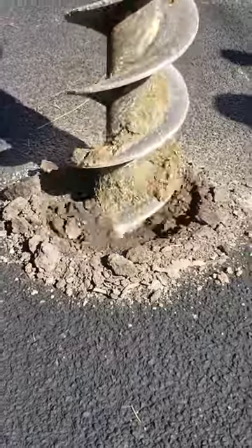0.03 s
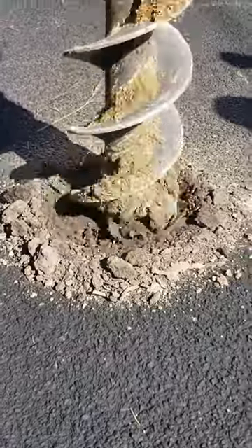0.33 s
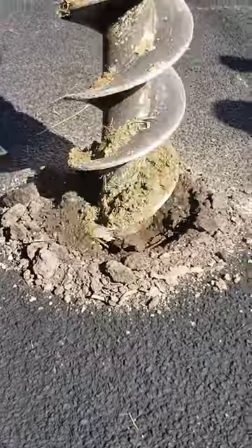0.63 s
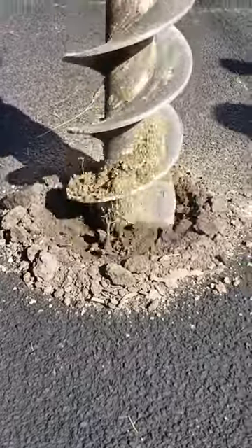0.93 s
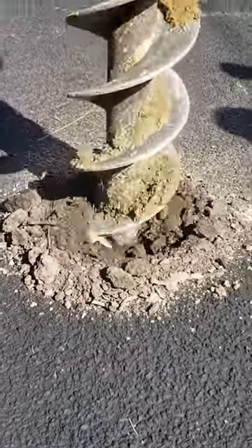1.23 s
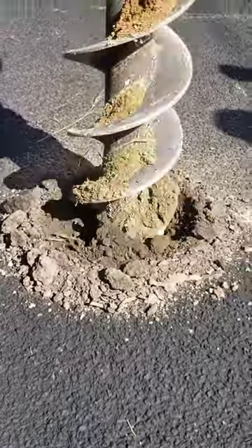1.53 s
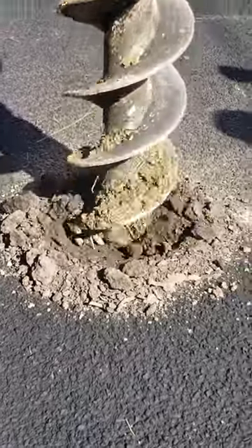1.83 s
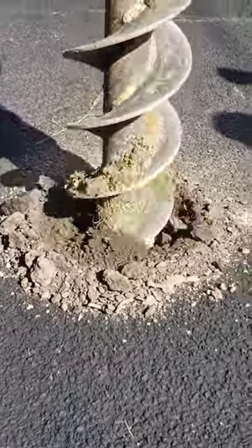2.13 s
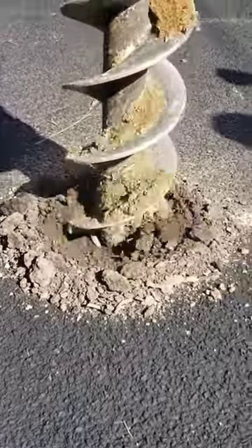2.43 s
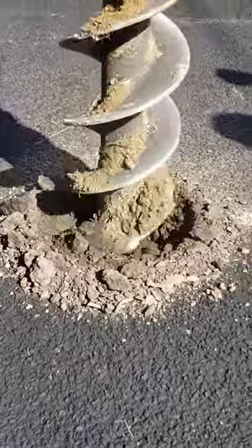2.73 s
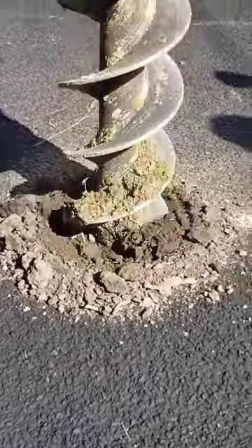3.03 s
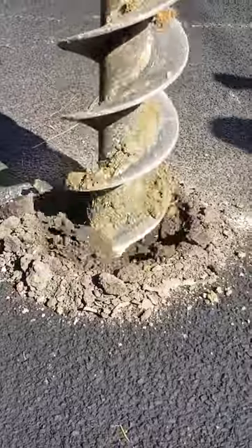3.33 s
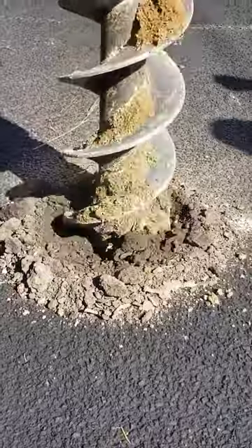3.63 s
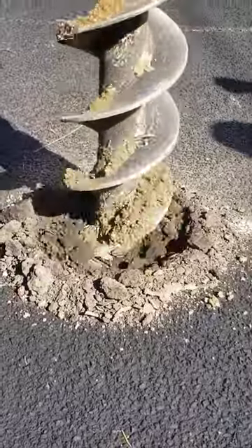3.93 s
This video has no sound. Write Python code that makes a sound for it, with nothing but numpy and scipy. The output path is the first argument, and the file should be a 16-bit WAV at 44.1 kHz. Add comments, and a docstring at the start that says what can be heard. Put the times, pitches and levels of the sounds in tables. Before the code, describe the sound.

A diesel engine drones and clatters at steady speed, with a strong fan hum and a hydraulic whine. The auger it drives scrapes through soil and grit, squeaking briefly against a hole in asphalt about once a second.

```python
"""A three-cylinder diesel drones and clatters at steady speed from the outset, while its cooling fan sings
one strong note and its hydraulic pump whines. It drives an earth auger slowly round in a hole in asphalt.
Soon the steel flight squeals thinly in the soil, grit ticks against it and the loaded auger groans.
At about 0.65 s, and then once a turn (1.1 s), the flight scrapes harder and squeaks on the rim."""
import sys
import numpy as np
from scipy import signal
from scipy.fft import rfft, irfft, next_fast_len
from scipy.io import wavfile
from scipy.ndimage import map_coordinates

SR = 44100
rng = np.random.default_rng(int(sys.argv[2]) if len(sys.argv) > 2 else 0)


def persist_wave(psi):
    """Save psi, clipped to +-1, as 16-bit WAV."""
    counts = np.round(np.clip(psi, -1, 1) * 32767).astype(np.int16)
    wavfile.write(sys.argv[1], SR, np.atleast_2d(counts).T)


N = 176400

# Spectra of bright hiss and of rubbed soil. Each row: frequency in Hz, relative density in dB.
HISS_SPECTRUM = [(1500, -100), (3500, -84.5), (5000, -93), (6300, -123), (7900, -112), (10000, -96.5),
                 (12500, -88.5), (15500, -90)]
SOIL_SPECTRUM = [(250, -65), (900, -64), (1600, -61), (2200, -66), (3000, -70), (4200, -83), (6000, -90.5),
                 (7900, -104), (13000, -91.5)]
# Ringing tones of the steel flight, plus one narrow treble resonance near 5.4 kHz that colours the
# scrape. Each row: frequency in Hz, relative gain in dB, 60 dB decay time in seconds.
RESONANCES = [(2053, 0, .12), (2266, 3, .13), (2985, 0, .13), (3790, -1, .08), (4270, -2, .08),
              (5420, 4, .08)]


def amp(db):
    """Decibels as an amplitude ratio."""
    return 10 ** (np.asarray(db) / 20)


def along(points, hz):
    """Interpolation of (Hz, value) points on a logarithmic frequency axis."""
    frequencies, values = np.transpose(points)
    return np.interp(np.log(hz + 1), np.log(frequencies + 1), values)


def clock():
    """Sample times in seconds."""
    return np.arange(N) / SR


def curve(rows):
    """Linear interpolation of (seconds, value) rows at every sample."""
    return np.interp(clock(), *np.transpose(rows))


def wobble(rate):
    """Slow noise: a spline through rate random knots a second."""
    return map_coordinates(rng.standard_normal(int(N * rate / SR) + 4), [clock() * rate])


def filtered(x, response):
    """Linear filtering: the spectrum of x times a frequency response."""
    size = next_fast_len(N + SR // 2)
    return irfft(rfft(x, size) * response(np.fft.rfftfreq(size, 1 / SR)), size)[..., :N]


def noise(spectrum, gain=1):
    """Partially coherent noise at two microphone ports, shaped in time by gain, then coloured."""
    # Each row: frequency in Hz, correlation between the ports.
    coherence = [(100, 0.68), (450, 0.74), (700, 0.44), (1100, 0.25), (5000, 0.1)]

    def colour(hz):
        spread = np.arccos(np.clip(along(coherence, hz), -1, 1)) / 2
        return amp(along(spectrum, hz)) * [np.cos(spread), np.sin(spread)]
    white = rng.standard_normal((2, N)) * np.sqrt(SR / 2)
    mid, side = filtered(gain * white, colour)
    return np.array([mid + side, mid - side])


def tones(angle, harmonics, flutter, rate, smear_rad=3):
    """Fourier synthesis: fluttering harmonics of an angle, which join into pulses if nearly in phase."""
    out = np.zeros(N)
    for order, db in harmonics:
        waver = 1 + flutter * (wobble(rate) + 1j * wobble(rate))
        phase = round(order) * angle + smear_rad * rng.standard_normal()
        out += np.sqrt(2) * amp(db) * np.imag(waver * np.exp(1j * phase))
    return out


def throb(angle, order, depth_db):
    """Amplitude modulation: a gain of rms 1 that peaks order times a cycle."""
    gain = amp(depth_db * np.cos(order * angle + rng.uniform(0, 2 * np.pi)))
    return gain / np.sqrt(np.mean(gain ** 2))


def arch(start, length):
    """A rounded envelope: the square root of a half sine."""
    return np.abs(np.sin(np.pi * np.clip((clock() - start) / length, 0, 1))) ** .5


def engine(angle):
    """Periodic forcing: exhaust, block and gears sound harmonics of the cycle over pulsing noise."""
    # Each row: multiple of the cycle rate, level in dB.
    exhaust_orders = [(3, -31.5), (6, -24.5), (9, -37)]
    block_orders = [(5, -47.5), (10, -44), (11, -43), (12, -55), (14, -50.5), (17, -47.5), (18, -56.5),
                    (24, -50.5), (27, -44.5), (33, -43.5), (34, -45), (36, -47)]
    timing_gear_orders = [(55, -45.5), (70, -52.5), (72, -46.5), (82, -44.5), (86, -51), (92, -49.5),
                          (94, -55.5), (98, -54), (167, -55)]
    whine_orders = [(164, -43)]
    # Each row: frequency in Hz, spectral density in dB.
    rumble_spectrum = [(12, -88.5), (25, -77), (40, -54.5), (85, -53.5), (130, -54.5), (200, -64.5),
                       (300, -71), (700, -100)]
    clatter_spectrum = [(400, -88), (850, -69.5), (1300, -64), (1750, -82), (2400, -76.5), (2800, -71.5),
                        (3300, -86), (5000, -100), (8000, -112)]
    surge_rad = .04  # the crank surges once a cycle
    firing = tones(angle + surge_rad * np.sin(angle), exhaust_orders, flutter=.04, rate=14, smear_rad=.45)
    drone = tones(angle, block_orders, flutter=.08, rate=13)
    rumble = noise(rumble_spectrum, throb(angle, order=3, depth_db=2.5))
    gears = tones(angle, timing_gear_orders, flutter=.28, rate=30)
    whine = tones(angle, whine_orders, flutter=.18, rate=79)
    knocks = throb(angle, order=4, depth_db=2.6) * throb(angle, order=9, depth_db=1.7)
    clatter = noise(clatter_spectrum, knocks * amp(.5 * wobble(8.3)))
    return firing + drone + rumble + gears + whine + clatter


def fan(angle):
    """A tone at the blade-passing frequency stands above the broadband noise of rushing air."""
    # Each row: harmonic number, level in dB.
    blade_harmonics = [(1, -19.5), (3, -46)]
    # Each row: frequency in Hz, spectral density in dB.
    air_spectrum = [(120, -84.5), (260, -66.5), (350, -64), (500, -60.5), (660, -53.5), (770, -63.5),
                    (1300, -69), (2600, -73.5), (4000, -79.5), (8000, -110)]
    passes_per_cycle = 36.76
    return tones(passes_per_cycle * angle, blade_harmonics, flutter=.018, rate=42) + noise(air_spectrum)


def pump(angle):
    """Oil pressure modulates the amplitude of whine and hiss; the hiss also pulses at the firing rate."""
    # Each row: harmonic number, level in dB at peak pressure.
    pump_harmonics = [(1, -35), (2, -37), (3, -47.5), (6, -53.5), (7, -61.5)]
    # The auger takes up its load. Each row: time in seconds, pressure in dB relative to its peak.
    pressure_db = [(0, -7), (.3, -5.5), (.6, 0), (1.1, -1.5), (2.5, -1.5), (4, -1)]
    periods_per_cycle = 25.45
    pressure = amp(curve(pressure_db))
    pulse = throb(angle, order=3, depth_db=2.5) * throb(angle, order=1, depth_db=2.5)
    pulse *= amp(.7 * wobble(28))
    whine = pressure * tones(periods_per_cycle * angle, pump_harmonics, flutter=.24, rate=34)
    return whine + noise(HISS_SPECTRUM, pressure * pulse)


def scrape():
    """Friction noise: a continuous rub, broken by clods that crumble as a Poisson process."""
    # How hard the flight scrapes. Each row: time in seconds, gain in dB.
    effort_db = [(0, -30), (.25, -10.5), (.5, -4.5), (.63, 3.5), (.8, -6), (1.05, -9.5), (1.4, -6),
                 (1.62, -.5), (1.82, 2), (1.95, -13), (2.4, -4.5), (2.6, -9), (2.9, 0), (3.05, -8.5),
                 (3.35, -13), (3.72, -3), (3.88, -6), (4, 2.5)]
    crumbs_per_s, crumb_db, spread_db, decay_s = 130, -3, 2, .0028
    breaks = rng.random(N) < crumbs_per_s / SR
    strength = amp(crumb_db + spread_db * np.clip(rng.standard_normal(N), -2, 2))
    crumbs = signal.lfilter([1], [1, -np.exp(-1 / (decay_s * SR))], breaks * strength)
    rub = amp(-3 + 1.6 * wobble(350) + 1.5 * wobble(30))
    return noise(SOIL_SPECTRUM, amp(curve(effort_db)) * np.hypot(crumbs, rub))


def ring(drive):
    """Resonance: damped resonators give the flight's ringing tones and one narrow treble peak."""
    def resonator(f, hz, db, t60):
        bandwidth_hz = np.log(1000) / np.pi / t60
        damping = 1j * f * bandwidth_hz
        return amp(db) * damping / (hz * hz - f * f + damping)
    return filtered(drive, lambda f: sum(resonator(f, *row) for row in RESONANCES))


def squeals():
    """Friction-excited vibration: steel sliding in soil gives a thin, unsteady tone."""
    # Each row: start in seconds, length in seconds, level in dB.
    slips = [(0.088, 0.12, -35), (0.569, 0.03, -26), (1.198, 0.068, -32), (3.43, .1, -35)]
    centre_hz = 1730
    pitch = centre_hz * (1 + .04 * wobble(400))
    envelope = sum(amp(db) * arch(start, length) for start, length, db in slips)
    return envelope * np.sin(2 * np.pi * np.cumsum(pitch) / SR)


def grit():
    """Impact transients: each stone on the flight gives a dull knock, a hard click and a bright edge."""
    # Each row: start in seconds, then gains of knock, click and edge in dB.
    strikes = [(.353, -4, -5, -8), (.507, 3, 2.5, 3), (.578, 1, -7, 14), (.608, -1, -5, 0),
               (.732, 0, -5, 3), (1.592, -2, -7, -3), (1.685, 0, -5, 5), (1.777, 2, 2.5, 6),
               (1.824, 0, -5, 2), (2.725, 2, -1.5, -4), (2.792, -7, -8, 9), (3.487, 3.5, -12, -6)]
    # Each row: frequency in Hz, relative density in dB.
    click_spectrum = [(2000, -86), (3700, -65), (5300, -74), (6400, -91), (8000, -108)]
    t60_s = .039
    starts, knock_db, click_db, edge_db = np.transpose(strikes)
    age = clock() - starts[:, None]
    decay = (age >= 0) * amp(-60 * np.abs(age) / t60_s)
    knock = noise(SOIL_SPECTRUM, amp(knock_db) @ decay)
    click = noise(click_spectrum, amp(click_db) @ decay)
    edge = noise(HISS_SPECTRUM, amp(edge_db) @ decay)
    return knock + click + edge


def groans():
    """Low-frequency vibration: the loaded auger judders in the hole in short glides."""
    # Each row: start and length in seconds, first and last pitch in Hz, level in dB.
    judders = [(0.559, .12, 110, 65, -30.5), (1.667, .12, 93.5, 68.6, -27.5),
               (2.41, .1, 103.4, 55.3, -24.5), (2.72, .08, 100, 60.3, -31), (2.94, .09, 54.9, 95, -25)]
    out = np.zeros(N)
    for start, length, from_hz, to_hz, db in judders:
        pitch = curve([(start, from_hz), (start + length, to_hz)])
        phase = 2 * np.pi * np.cumsum(pitch) / SR + rng.uniform(0, 2 * np.pi)
        out += amp(db) * arch(start, length) ** 2 * np.sin(phase)
    return out


def squeaks():
    """Friction on the rim excites the flight's two lowest modes, which beat under a rasp and ring on."""
    # Each row: start and hold in seconds, gain in dB, second mode relative to the first in dB.
    rim_slips = [(.647, .012, -15, -7), (1.757, .011, -17.3, -2), (2.867, .012, -20.5, -9),
                 (3.967, .008, -27, -3), (3.985, .012, -22.5, -2)]
    # Each row: frequency in Hz, relative density in dB.
    rasp_spectrum = [(500, -87), (1300, -60), (2100, -54), (3000, -56), (4000, -62), (5800, -75),
                     (7200, -95), (8500, -93), (13000, -78.5)]
    attack_s, release_t60_s = .005, .055
    pitch_jitter, flutter_db, rasp_db, ring_db = .03, 1.5, 8, -6
    t, out, pressing = clock(), np.zeros((2, N)), np.zeros(N)
    for start, hold, db, upper_db in rim_slips:
        attack = np.clip((t - start) / attack_s, 0, 1)
        release = amp(-60 * np.maximum(t - start - hold, 0) / release_t60_s)
        bite = amp(db) * attack * release
        for (hz, _, _), share in zip(RESONANCES, [1, amp(upper_db)]):
            pitch = hz * (1 + pitch_jitter * wobble(700))
            flutter = amp(flutter_db * wobble(400))
            out += share * bite * flutter * np.sin(2 * np.pi * np.cumsum(pitch) / SR)
        pressing += bite
    out += noise(rasp_spectrum, amp(rasp_db) * pressing)
    return out + amp(ring_db) * ring(out)


def scene():
    """Superposition: one crankshaft drives engine, fan and pump, while soil and grit ring the flight."""
    # Each row: time in seconds, engine speed in four-stroke cycles per second.
    cycle_rate = [(0, 16.75), (.3, 16.76), (.66, 16.72), (1.05, 16.76), (1.75, 16.73), (2.2, 16.76),
                  (2.85, 16.745), (3.5, 16.76), (4, 16.73)]
    angle = 2 * np.pi * np.cumsum(curve(cycle_rate)) / SR
    machine = engine(angle) + fan(angle) + pump(angle)
    contact = scrape() + grit()
    return machine + contact + amp(1.5) * ring(contact) + squeals() + groans() + squeaks()


def record(dry):
    """Level and time differences: the left port is thin and bright, the right one muffled and late."""
    # Each row: frequency in Hz, left level minus right level in dB.
    balance = [(50, -9.5), (100, -12), (185, -8.5), (240, 2.5), (350, 4.5), (430, 13), (616, 12),
               (800, 14.5), (1400, 16.5), (2200, 21.5), (3200, 27.5), (5000, 32.5), (13000, 32.5)]
    delay_s, band_limit_hz = .00044, 15550

    def ports(hz):
        tilt_db = along(balance, hz)
        left = amp(np.minimum(tilt_db, 0))
        right = amp(-np.maximum(tilt_db, 0)) * np.exp(-2j * np.pi * hz * delay_s)
        return np.array([left, right]) * (hz < band_limit_hz)
    return filtered(dry, ports)


dry = scene()
out = record(dry)
persist_wave(out)
```